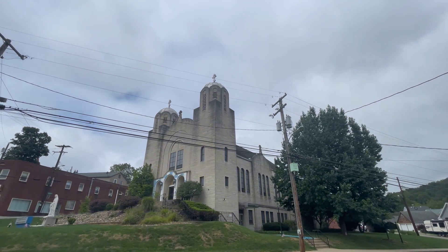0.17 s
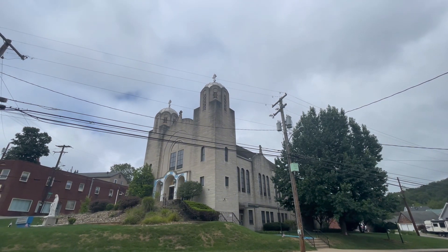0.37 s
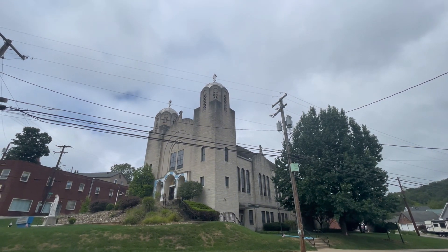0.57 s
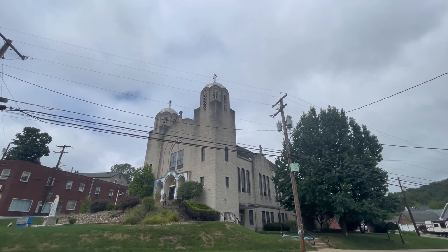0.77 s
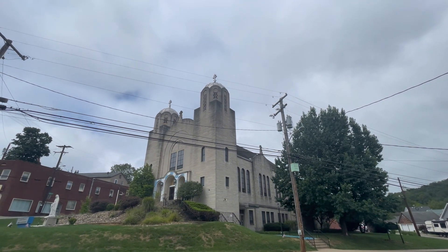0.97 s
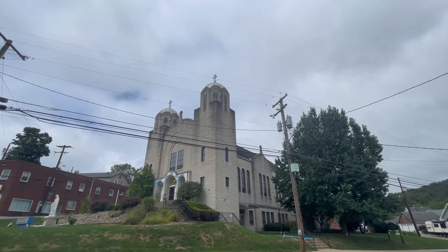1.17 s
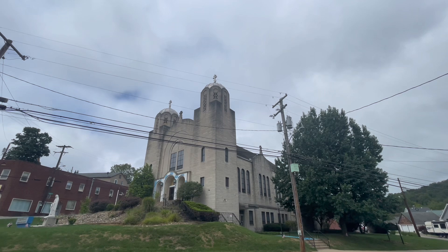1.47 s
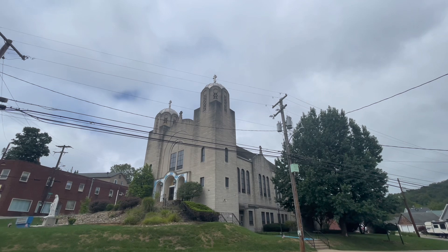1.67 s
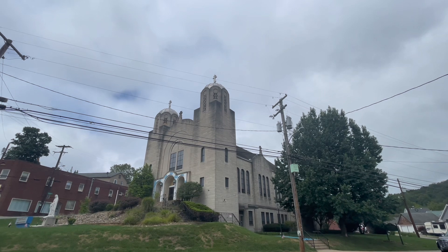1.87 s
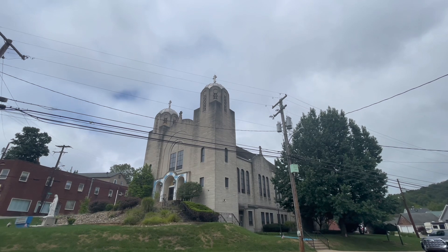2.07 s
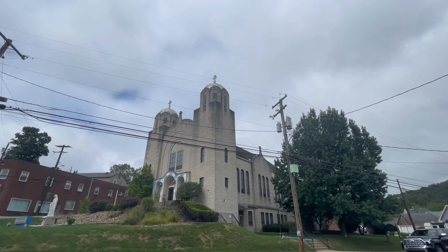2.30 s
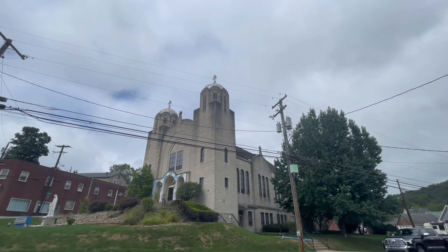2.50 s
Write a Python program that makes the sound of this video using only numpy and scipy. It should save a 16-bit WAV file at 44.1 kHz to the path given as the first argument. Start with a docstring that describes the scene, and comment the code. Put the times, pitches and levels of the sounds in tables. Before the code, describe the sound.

A large bronze church bell, already struck, rings and slowly fades outdoors as a car approaches

```python
"""Church bell and a nearing car

A large bronze bell, already struck, rings across a lawn: fading tones that beat, with blurred echoes.
A car rolls nearer: noise for its tyres, wavering tones for its engine and exhaust, and a rough whine.
Far traffic hums as coloured noise over an idling motor. A sparrow chips faintly in gliding whistles,
and a hollow knock and a few low thumps are short fading tones."""
import sys
import numpy as np
from scipy import signal
from scipy.fft import rfft, irfft
from scipy.io import wavfile
from scipy.ndimage import map_coordinates

SR = 44100
rng = np.random.default_rng(int(sys.argv[2]) if len(sys.argv) > 2 else 0)


def invert_db(level):
    """Linear amplitude ratio for a level in decibels (20 dB per decade), elementwise."""
    return 10 ** (np.asarray(level, dtype=float) / 20)


def waveform_to_disk(signal):
    """Save audio, clipped to [-1, 1], as 16-bit WAV at the path in sys.argv[1]."""
    frames = np.transpose(np.atleast_2d(signal))
    scaled = np.clip(frames, -1, 1) * 32767
    samples = np.round(scaled).astype(np.int16)
    wavfile.write(sys.argv[1], SR, samples)


N = 116424  # length in samples
time_s = np.arange(N) / SR
spectrum_hz = np.arange(N // 2 + 1) * SR / N


def set_rms(x, db):
    """Scales a signal to a chosen average (rms) level in dB."""
    return x * invert_db(db) / np.sqrt(np.mean(np.abs(x) ** 2))


def curve(table, column):
    """Joins the points of one table column with straight lines over time."""
    rows = np.array(table)
    return np.interp(time_s, rows[:, 0], rows[:, column])


def on_log(table, hz):
    """Reads a table of (pitch, dB) along a log-frequency axis, as pitch is heard."""
    rows = np.array(table)
    return np.interp(np.log(np.maximum(hz, 1)), np.log(rows[:, 0]), rows[:, 1])


def walk(rate_hz):
    """Smooth random wander with rms 1, from random points spaced at rate_hz, at most 200 a second."""
    points = rng.standard_normal(int(N / SR * 200) + 8)
    place = np.minimum(rate_hz, 200) * time_s
    return set_rms(map_coordinates(points, [place], mode="mirror"), 0)


def coloured(table, flicker_db=1.0, rate_hz=8):
    """Noise with a given spectrum and rms 1; each half-octave band flickers on its own."""
    spectrum = rfft(rng.standard_normal(N)) * invert_db(on_log(table, spectrum_hz)) * (spectrum_hz > 15)
    half_octaves = 2 * np.log2(np.maximum(spectrum_hz, 1) / 20)
    noise = 0
    for band in range(21):
        share = np.clip(1 - abs(half_octaves - band), 0, 1)  # neighbouring bands overlap
        noise = noise + irfft(spectrum * share, N) * invert_db(flicker_db * walk(rate_hz))
    return set_rms(noise, 0)


def pan(tone, left_right_db, left_leads_rad=0.0):
    """Places a complex tone between two microphones by level and by phase."""
    gains = invert_db(np.array([left_right_db, -left_right_db]) / 2)
    turns = np.exp(np.array([0.5j, -0.5j]) * left_leads_rad)
    return np.real(tone * (gains * turns)[:, None])


def narrow(pitch_hz, width_hz):
    """A rough tone: its size and phase wander, which spreads its pitch."""
    steady_share = 0.84  # steady part, set against the random part
    steady = steady_share * np.exp(1j * walk(width_hz / 4))  # only its phase wanders
    rough = (walk(width_hz) + 1j * walk(width_hz)) / 2
    phase = 2 * np.pi * np.cumsum(pitch_hz * np.ones(N)) / SR
    return np.sqrt(2) * set_rms(steady + rough, 0) * np.exp(1j * phase)


def fade(t60_s):
    """Steady die-away that loses 60 dB in t60_s."""
    return invert_db(-60 * time_s / t60_s)


def echo_blur(tone, left_right_db, left_leads_rad):
    """Echoes off houses blur a tone: many late copies add up to a random change of size and phase."""
    rate_hz, t60_s, blur_db = 26.3, 1.6, -18.5
    apart_db = -8  # share of the blur that differs left and right
    shared = tone * (walk(rate_hz) + 1j * walk(rate_hz))
    apart = tone * (walk(rate_hz) + 1j * walk(rate_hz))
    blur = pan(shared, left_right_db, left_leads_rad)
    blur = blur + invert_db(apart_db) * pan(apart, left_right_db, left_leads_rad + np.pi)
    return blur * invert_db(blur_db) * fade(t60_s)


def clapper_wash():
    """Dense wash left by the clapper: many unresolved tones, heard as fading noise."""
    # colour of the wash: pitch_hz [Hz], level_db [dB per Hz, relative]
    wash_colour = [(500, -28.5), (750, 3), (1100, 6), (2000, -3.5), (3200, -9), (5000, -26), (8000, -58.5)]
    start_db, t60_s = -34.5, 0.59
    return np.array([coloured(wash_colour), coloured(wash_colour)]) * invert_db(start_db) * fade(t60_s)


def bell():
    """Bronze rings at many pitches; each fades on its own and beats with any close twins it has."""
    # bell tones: pitch_hz [Hz], level_db [dB rms at 0 s], t60_s [s],
    # left_right_db [dB], left_leads_rad [rad]
    partials = [(174.5, -41.0, 23.0, 1.0, 0.6), (348.7, -40.1, 23.0, -3.2, 1.3),
                (414.9, -42.7, 21.68, 4.8, 0.9), (532.6, -49.7, 3.04, 9.3, 2.9),
                (696.9, -36.5, 8.0, -1.5, 2.0), (909.7, -53.1, 3.14, -3.1, 0.6),
                (945.9, -55.5, 6.78, 8.7, 1.8), (958.0, -41.5, 2.0, 6.4, 1.3),
                (1046.7, -34.6, 10.75, 4.4, 1.6), (1142.5, -54.1, 7.28, 4.1, 1.9),
                (1354.5, -57.0, 4.55, -1.6, -1.7), (1446.1, -33.8, 3.19, 2.2, 0.6),
                (1491.0, -47.3, 1.8, -0.8, 1.8), (1592.0, -47.0, 5.09, -0.2, -2.6),
                (1688.9, -36.4, 1.46, -5.3, 2.2), (1882.4, -21.2, 5.08, -5.1, -2.55),
                (2168.8, -56.1, 2.76, -4.6, -0.3), (2241.1, -45.9, 2.72, -3.1, -1.1),
                (2341.9, -38.4, 3.54, 0.8, -1.5), (2394.9, -56.2, 2.89, 7.7, -1.9),
                (2579.3, -54.5, 1.69, 5.6, 2.5), (2782.9, -50.8, 0.83, 4.8, -1.8),
                (2818.9, -49.3, 3.19, -4.6, -0.2), (2928.9, -47.5, 1.95, -1.2, 0.7),
                (2991.0, -60.0, 0.68, -1.9, -2.9), (3300.9, -64.4, 6.65, 6.9, -1.1),
                (3328.0, -57.8, 1.23, 1.9, 2.3), (3401.8, -50.1, 1.5, -3.7, 1.7),
                (3764.8, -66.0, 3.2, 11.5, 0.3), (4270.2, -67.0, 2.6, 10.5, 0.4),
                (4701.5, -69.0, 2.2, 1.4, -0.3), (4749.4, -65.0, 2.4, -1.5, 0.8)]
    # close twins: partial_hz [Hz], offset_hz [Hz], level_db [dB rms at 0 s], t60_s [s],
    # left_right_db [dB], left_leads_rad [rad], in_step_s [s, when twin and partial line up]
    twins = [(348.7, 0.48, -40.6, 0.96, 0.8, 1.3, -1.007), (348.7, 0.87, -53.0, 13.8, -1.1, 0.8, -0.235),
             (958.0, 0.73, -51.9, 2.9, 14.0, -1.7, 0.376), (1046.7, 0.87, -46.0, 7.1, 4.2, 1.7, 0.011),
             (1046.7, 5.02, -33.7, 0.35, 4.7, 1.4, 0.03), (1446.1, -1.09, -42.3, 1.9, 0.6, 2.4, -0.197),
             (1446.1, 1.35, -43.3, 1.25, -0.9, 1.6, -0.254),
             (1592.0, -2.89, -59.1, 4.68, -14.0, -2.9, -0.145),
             (1882.4, 2.14, -40.5, 2.93, -4.9, -2.44, 0.059),
             (1882.4, -1.2, -31.4, 3.84, -6.5, -2.67, -0.185),
             (1882.4, 0.36, -44.0, 6.5, -7.5, -2.15, 0.928),
             (2241.1, 3.65, -56.6, 1.59, -4.8, -1.2, -0.101),
             (2341.9, -0.51, -50.0, 3.94, -4.2, -0.6, -0.819),
             (2341.9, 1.14, -46.9, 3.12, 9.8, -1.6, -0.378), (2818.9, -1.89, -54.4, 3.65, 0.3, 0.8, -0.146),
             (2818.9, -1.44, -55.1, 5.48, -0.8, -1.1, 0.281), (2928.9, -12.6, -48.0, 1.75, 3.0, 0.2, 0.025),
             (2928.9, -0.93, -59.5, 1.79, -22.4, 2.0, 0.532), (3401.8, 1.63, -59.6, 1.42, 3.5, 2.5, 0.271),
             (4270.2, -6.04, -68.0, 1.7, 11.6, 0.25, 0.105), (4701.5, -1.25, -74.1, 1.99, 6.1, -0.3, 0.388)]
    air_db, air_rate_hz = 0.35, 22  # moving air makes the tones waver
    ring = 0
    for pitch_hz, level_db, t60_s, left_right_db, left_leads_rad in partials:
        tone = np.sqrt(2) * np.exp(2j * np.pi * (pitch_hz * time_s + rng.random()))
        tone = tone * invert_db(air_db * walk(air_rate_hz))
        ring = ring + pan(invert_db(level_db) * tone * fade(t60_s), left_right_db, left_leads_rad)
        ring = ring + invert_db(level_db) * echo_blur(tone, left_right_db, left_leads_rad)
        for partial_hz, offset_hz, twin_db, twin_t60_s, twin_pan_db, twin_lead_rad, in_step_s in twins:
            if partial_hz == pitch_hz:
                twin = tone * np.exp(2j * np.pi * offset_hz * (time_s - in_step_s))
                ring = ring + pan(invert_db(twin_db) * twin * fade(twin_t60_s), twin_pan_db, twin_lead_rad)
    return ring + clapper_wash()


def knock():
    """One soft hollow knock: a single tone that swells briefly, then dies away fast."""
    peak_s, pitch_hz, peak_db = 0.102, 723, -35.5
    rise_s, t60_s = 0.032, 0.055
    since_s = time_s - peak_s
    shape = np.where(since_s < 0, np.exp(-(since_s / rise_s) ** 2), invert_db(-60 * since_s / t60_s))
    tone = np.sqrt(2) * invert_db(peak_db) * shape * np.exp(2j * np.pi * pitch_hz * since_s)
    return pan(tone, 3.0, 1.3)


def thumps():
    """Low dull thumps: a few cycles of a low tone under a bell-shaped swell."""
    # thumps: peak_s [s], pitch_hz [Hz], level_db [dB at the peak], half_length_s [s, to 1/e of the peak]
    thump_list = [(.262, 110, -39, .008), (.438, 140, -35, .011), (1.66, 106, -30, .006),
                  (2.245, 168, -36, .016), (2.3, 162, -36, .018)]
    bumps = 0
    for peak_s, pitch_hz, level_db, half_length_s in thump_list:
        since_s = time_s - peak_s
        swell = np.exp(-(since_s / half_length_s) ** 2)
        bumps = bumps + invert_db(level_db) * swell * np.exp(2j * np.pi * pitch_hz * since_s)
    return pan(np.sqrt(2) * bumps, -0.6, 0.4)


def tyres():
    """Tyre roar: coloured noise that swells as the car nears, spread wide by a second noise."""
    # loudness of the middle part: time_s [s], level_db [dB rms]
    loudness = [(0, -63), (.9, -56), (1.6, -54), (2.1, -47), (2.4, -46), (2.64, -45)]
    # colour of the middle part: pitch_hz [Hz], level_db [dB per Hz, relative]
    middle_colour = [(250, -10), (700, 6), (1000, 0), (2000, -10), (3400, -24), (4500, -29), (6000, -26),
                     (8500, -36.5), (10500, -31), (12500, -54.5)]
    # colour of the left-against-right part: pitch_hz [Hz], level_db [dB per Hz, relative]
    side_colour = [(250, -13), (700, 4), (1000, -5.5), (2000, -12.5), (3400, -18.5), (4500, -25),
                   (6000, -27.5), (9000, -30.5), (11500, -46.5), (15000, -39.5), (16500, -48)]
    mid = coloured(middle_colour, flicker_db=3.6)
    side = 0.53 * coloured(side_colour, flicker_db=1.5)
    return np.array([mid + side, mid - side]) * invert_db(curve(loudness, 1))


def engine():
    """Low rough engine thrum and exhaust boom: two wavering tones with moving pitch and level."""
    # engine thrum: time_s [s], pitch_hz [Hz], level_db [dB rms before a 1 dB cut]
    thrum_path = [(0, 80.47, -50), (.5, 80.9, -45.5), (.9, 77.32, -45), (1.2, 73.25, -48.5),
                  (1.5, 65.36, -45), (1.75, 61.3, -49), (2.0, 66.64, -44), (2.25, 62.9, -40),
                  (2.45, 57.9, -37.5), (2.64, 55.2, -35)]
    # exhaust boom: time_s [s], pitch_hz [Hz], level_db [dB rms]
    boom_path = [(0, 184.8, -57.5), (.45, 171.6, -51), (1.0, 165.1, -47.5), (2.1, 168.7, -46),
                 (2.27, 163.5, -42), (2.38, 159.1, -44), (2.5, 165.6, -34.6), (2.64, 152, -35)]
    thrum = invert_db(curve(thrum_path, 2) - 1.0) * narrow(curve(thrum_path, 1), width_hz=14)
    boom = invert_db(curve(boom_path, 2)) * narrow(curve(boom_path, 1), width_hz=14)
    return pan(thrum, -0.86, 0.2) + pan(boom, 0.1, 0.61)


def whine():
    """A rough wavering note that climbs in pitch while the car nears."""
    # whine: time_s [s], pitch_hz [Hz], level_db [dB rms]
    whine_path = [(1.2, 696, -59), (1.6, 695, -45), (2.1, 759, -54), (2.55, 757, -61)]
    note = invert_db(curve(whine_path, 2)) * narrow(curve(whine_path, 1), width_hz=12)
    return pan(note, -2.5, 1.3)


def car():
    """The nearing car: tyre noise, engine and exhaust tones, and a whine added together."""
    return tyres() + engine() + whine()


def sparrow():
    """Faint chips: short whistles whose pitch glides and arches, each swelling and fading once."""
    # notes: start_s [s], length_s [s], from_hz [Hz], to_hz [Hz],
    # arch_hz [Hz, extra pitch halfway], level_db [dB at the peak]
    chips = [(.822, 0.027, 5350, 5330, 80, -71), (1.733, .014, 5900, 5750, 20, -74.5),
             (1.7505, 0.023, 4000, 4050, 1440, -62.5), (1.7668, 0.0105, 4280, 4220, 20, -58.5),
             (1.775, 0.015, 4150, 4250, -60, -66.5)]
    song = 0
    for start_s, length_s, from_hz, to_hz, arch_hz, level_db in chips:
        progress = np.clip((time_s - start_s) / length_s, 0, 1)
        swell = np.sin(np.pi * progress)
        pitch_hz = from_hz + (to_hz - from_hz) * progress + arch_hz * swell
        whistle = np.exp(2j * np.pi * np.cumsum(pitch_hz) / SR)
        song = song + np.sqrt(2) * invert_db(level_db) * swell * whistle
    return pan(song, 11.5, 1.4)


def far_motor():
    """A far idling motor: one low tone that wavers."""
    return pan(invert_db(-50) * narrow(104.6, width_hz=5.66), -2.0)


def traffic():
    """Far roar: two coloured noises, leaning right in the bass and left in the treble."""
    # colour of the middle part: pitch_hz [Hz], level_db [dB per Hz, relative]
    mid_colour = [(18, -27.5), (30, -11), (52, 0.5), (100, -3.5), (170, -5.5), (260, -11), (500, -16.5),
                  (800, -17), (1300, -23.5), (2200, -30), (3400, -40.5), (4500, -44.5), (6500, -50),
                  (8500, -64), (10200, -59), (12500, -64.5), (16000, -86)]
    # colour of the left-against-right part: pitch_hz [Hz], level_db [dB per Hz, relative]
    side_colour = [(18, -31), (30, -12.5), (52, -17.5), (100, -6), (170, -6.5), (300, -8), (600, -8.5),
                   (1300, -13), (2200, -26.5), (3400, -22.5), (4500, -43), (6500, -35), (9000, -47),
                   (11000, -56), (15000, -61.5), (17000, -80.5)]
    # lean at each pitch: pitch_hz [Hz], left_right_db [dB]
    lean_table = [(40, -5), (120, -2), (300, -1), (1000, 1.5), (3000, 2), (6000, 10.5), (11000, 1.5)]
    mid = invert_db(-40) * coloured(mid_colour)
    side = invert_db(-48) * coloured(side_colour)
    half_lean_db = on_log(lean_table, spectrum_hz) / 2
    spectra = rfft(np.array([mid + side, mid - side]))
    return irfft(spectra * invert_db([half_lean_db, -half_lean_db]), N)


def scene():
    """Adds up everything heard on the lawn."""
    return bell() + knock() + thumps() + car() + sparrow() + traffic() + far_motor()


def band_limit(x):
    """A steep low-pass at the top of the band."""
    return signal.sosfilt(signal.butter(12, 15750, fs=SR, output="sos"), x)


def record(dry):
    """The phone stores the finished stereo mix."""
    return band_limit(dry)


dry = scene()
out = record(dry)
waveform_to_disk(out)
```